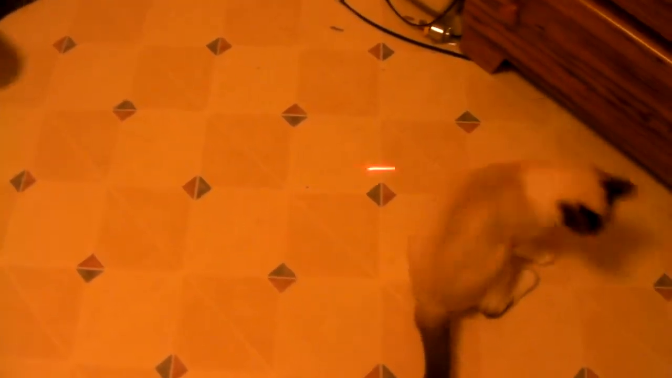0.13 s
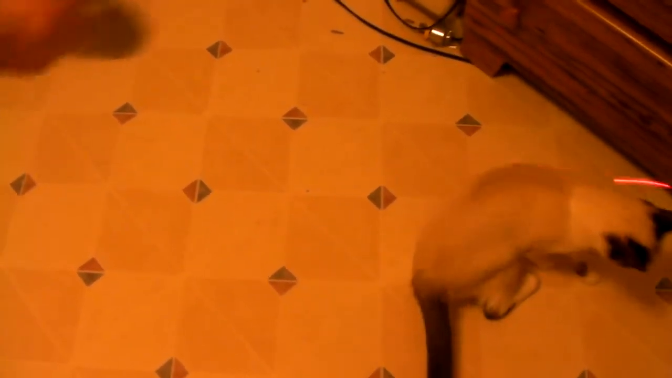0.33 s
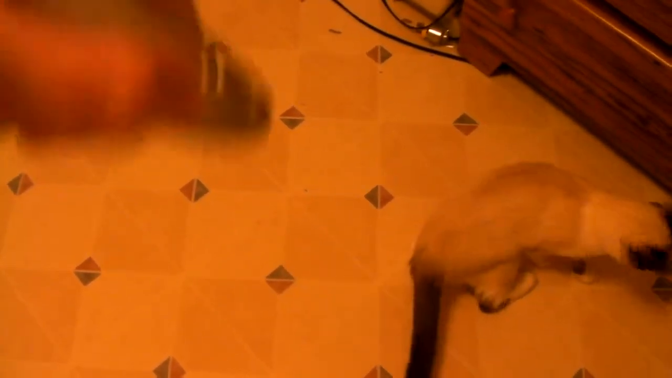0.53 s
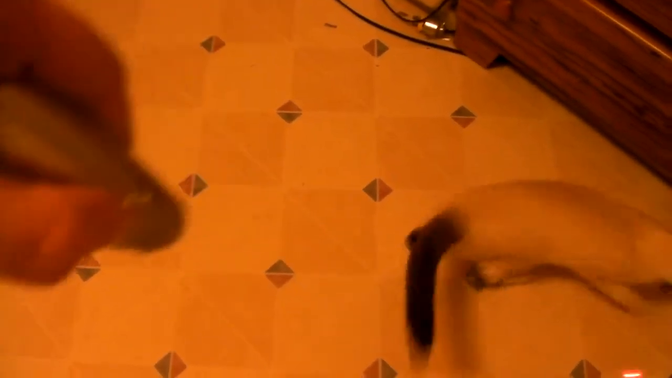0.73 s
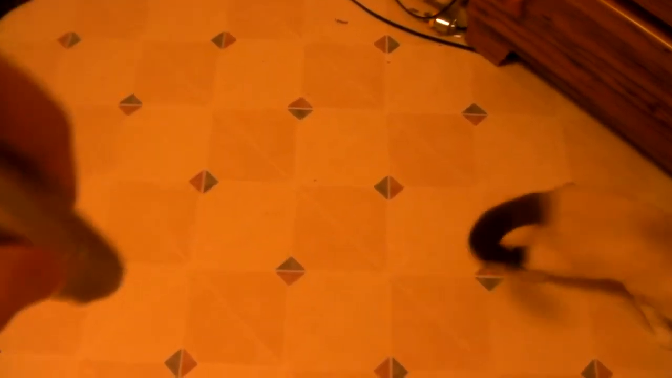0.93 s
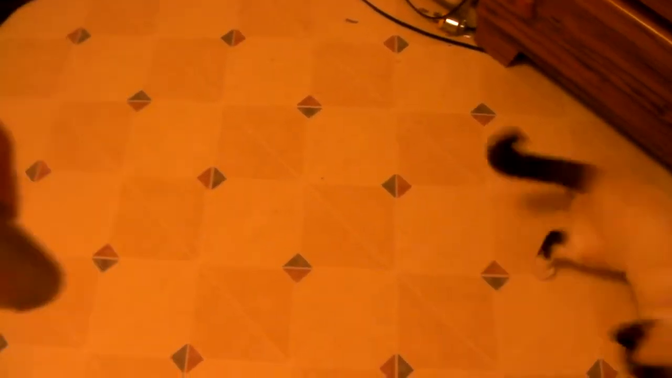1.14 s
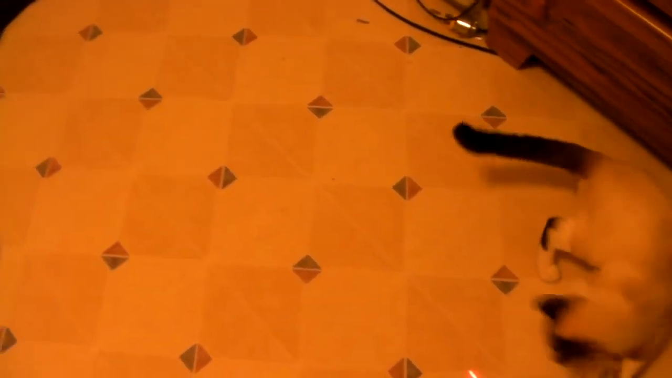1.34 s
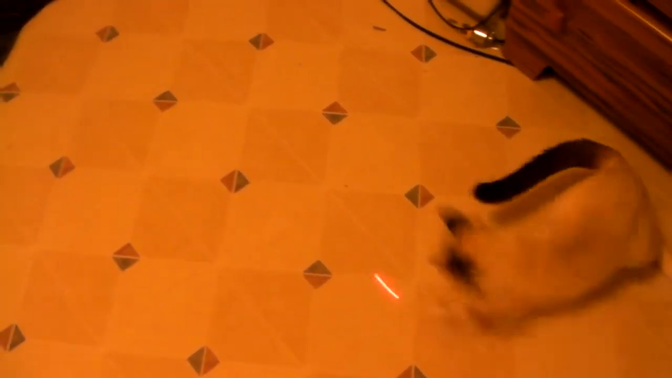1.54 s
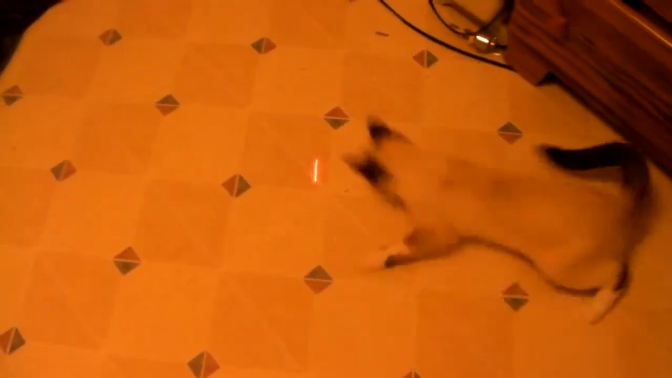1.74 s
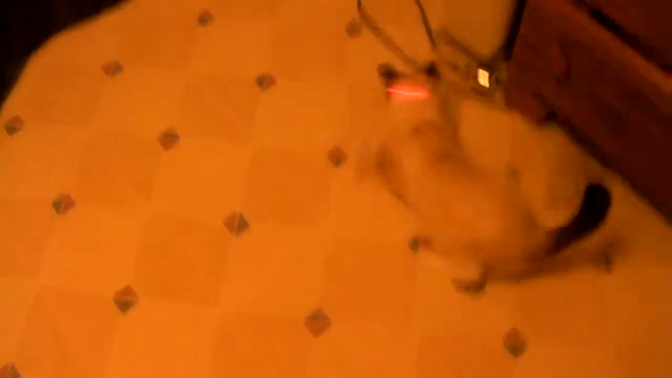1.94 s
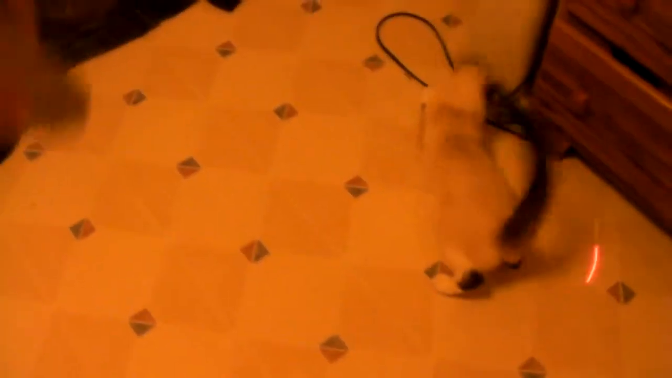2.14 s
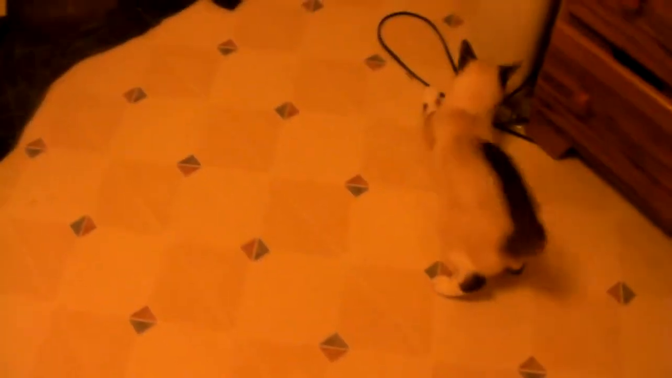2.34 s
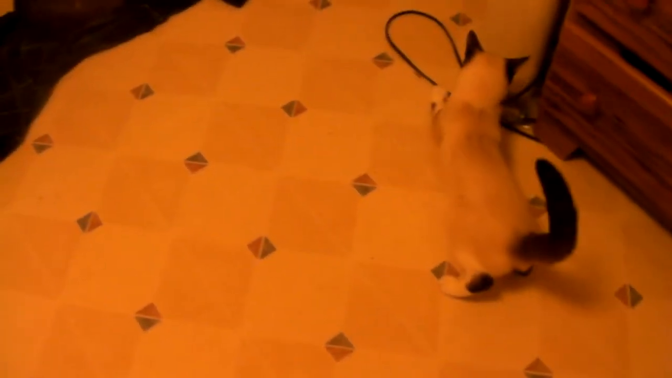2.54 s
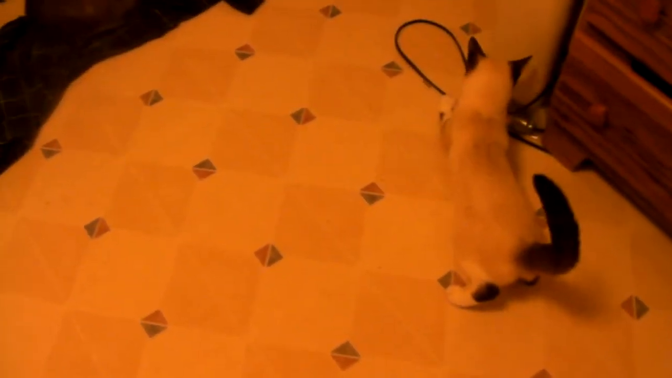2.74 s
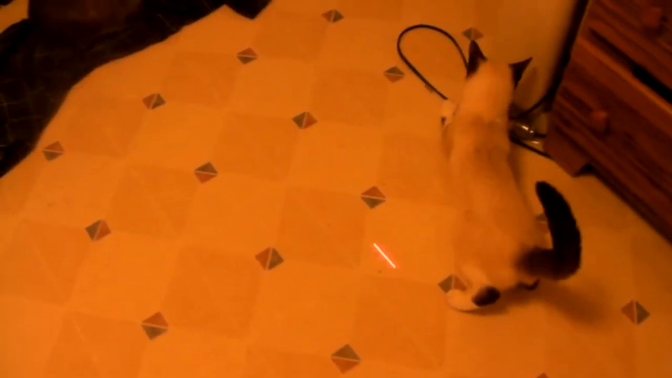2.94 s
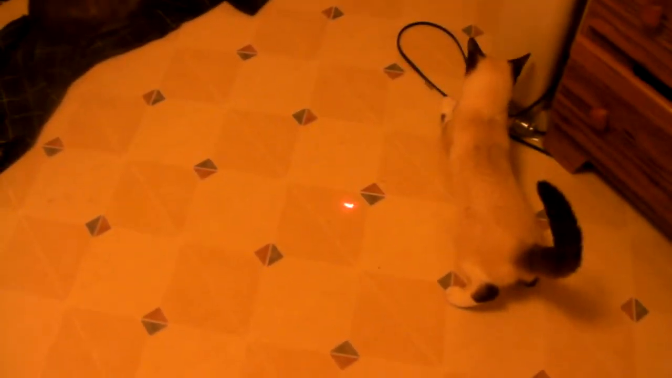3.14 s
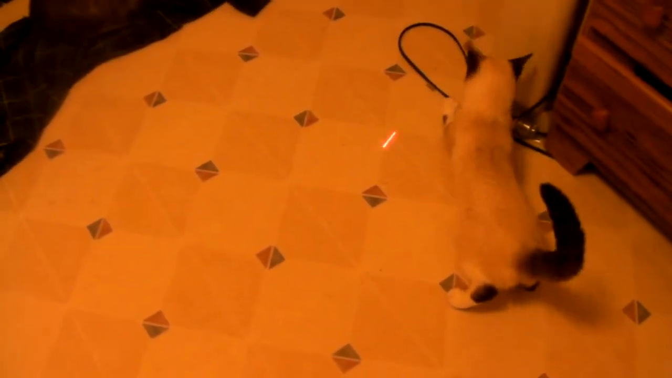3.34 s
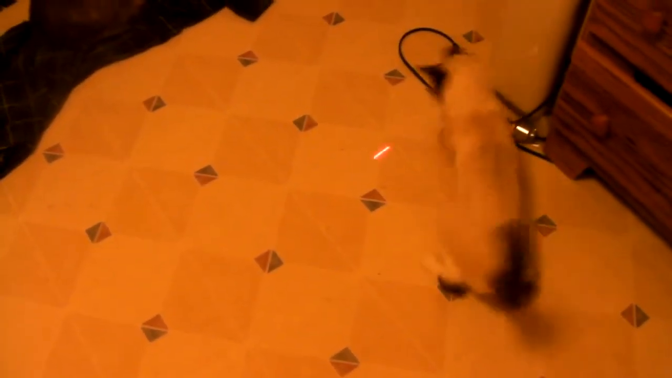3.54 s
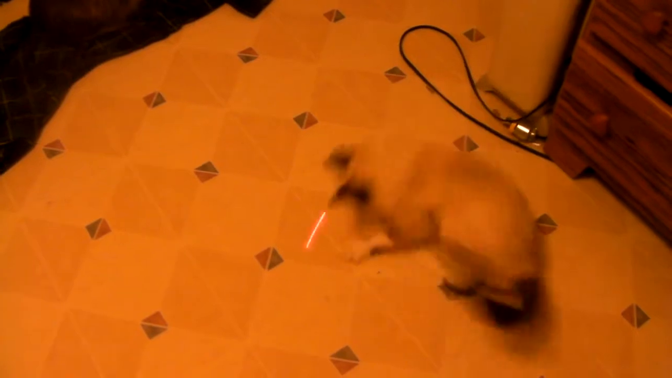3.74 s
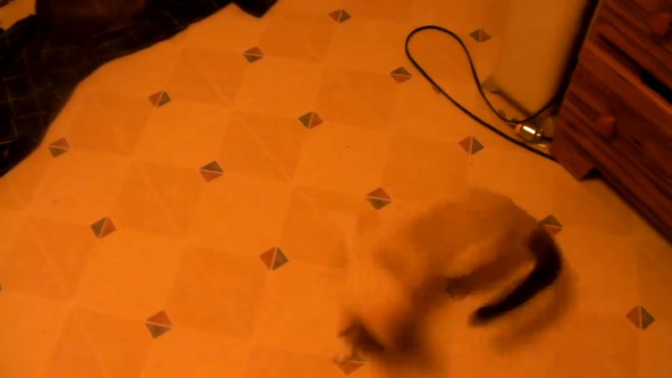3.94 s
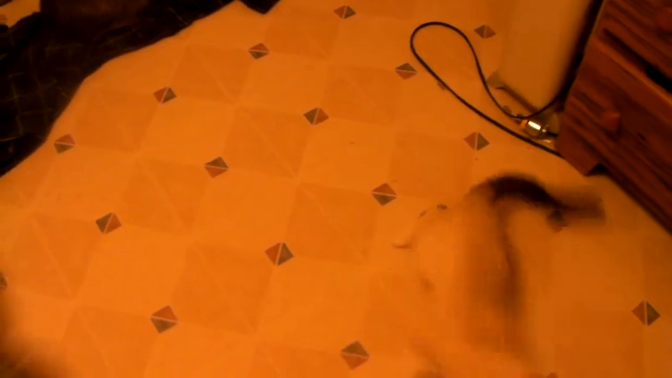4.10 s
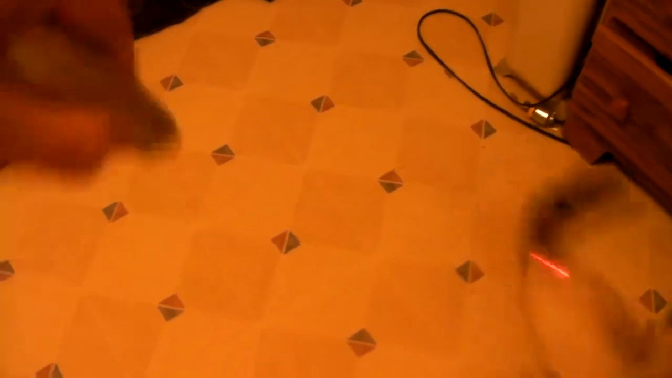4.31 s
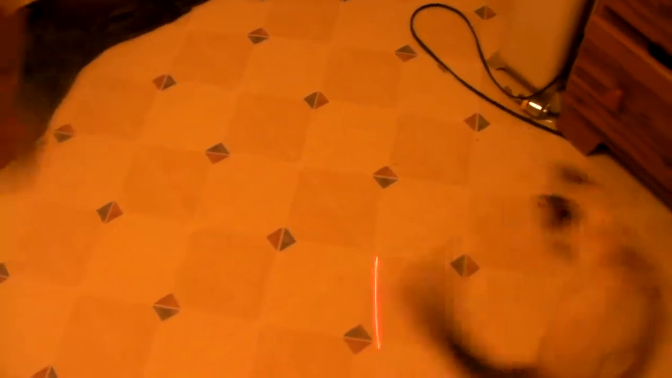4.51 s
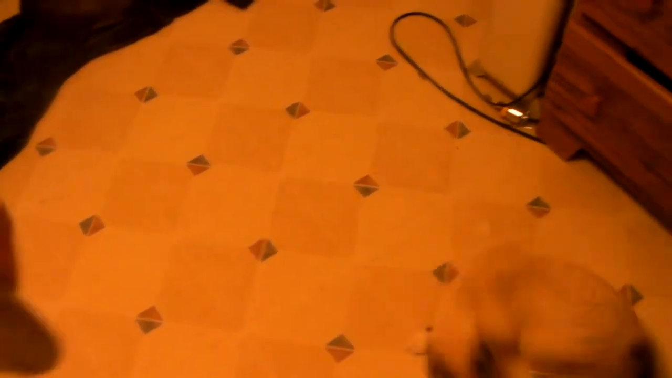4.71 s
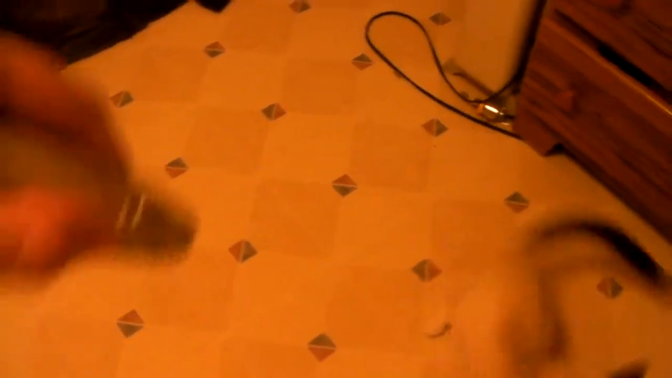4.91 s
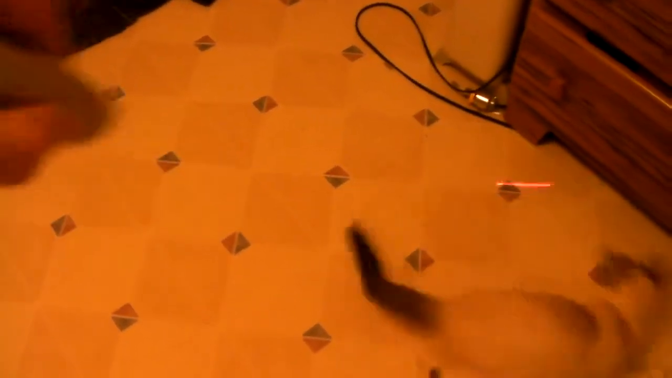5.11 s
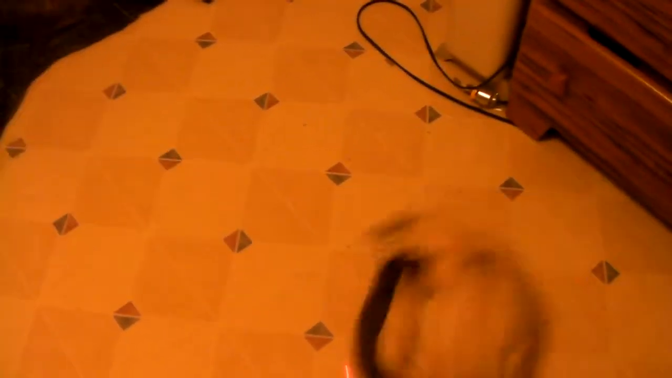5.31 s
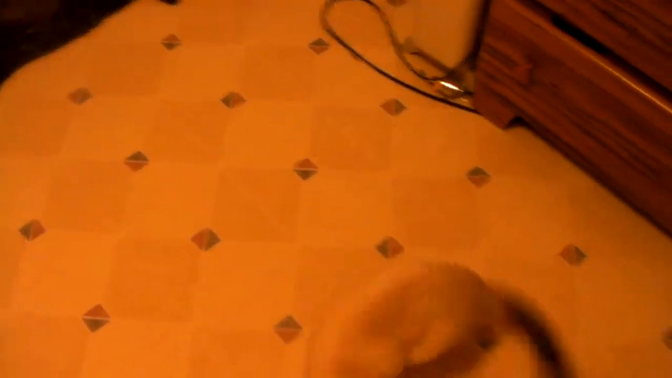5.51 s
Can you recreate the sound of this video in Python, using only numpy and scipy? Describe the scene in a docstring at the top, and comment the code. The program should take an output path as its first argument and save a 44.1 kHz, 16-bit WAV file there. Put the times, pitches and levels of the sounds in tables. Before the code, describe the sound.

In a small quiet room, a kitten pads softly on a hard floor, then dashes with sharp claw clicks, gritty skids and low paw thumps, ending in a hollow bump against a wooden chest. After a lull it scrambles again for longer, fur swishing, with a fainter bump near the end. A nearby hand-held microphone also picks up light hiss and a faint machine whirr.

```python
"""Kitten chasing a dot of light

A kitten dashes over a hard floor in a small room, heard from a hand-held camera. Its claws snap and
ring as they strike and rasp as they skid; its pads rub and thump the floor, and its fur swishes with
each step. Once it runs into the corner by a wooden chest, and a fainter bump comes near the end.
Under it all lie still air, a faint machine whirr and the hiss of the camera."""
import sys
import numpy as np
from scipy import signal
from scipy.fft import rfft, irfft
from scipy.io import wavfile
from scipy.ndimage import uniform_filter1d

SR = 44100
rng = np.random.default_rng(int(sys.argv[2]) if len(sys.argv) > 2 else 0)


def to_wav(s):
    """Save 16-bit WAV."""
    ch = np.atleast_2d(s).T  # columns
    pcm = np.round(np.clip(ch, -1, 1) * 32767)  # PCM
    wavfile.write(sys.argv[1], SR, pcm.astype(np.int16))


N = 245195


def gain_of(db):
    """Decibels to amplitude."""
    return 10 ** (np.asarray(db) / 20)


def curve_at(points, hz):
    """Reads a curve on a log-frequency axis."""
    f, value = np.transpose(points)
    return np.interp(np.log(hz + 1), np.log(f + 1), value)


def add(mix, s, sound):
    """Mixes a stereo sound in at time s."""
    part = mix[:, max(round(s * SR), 0):][:, :sound.shape[1]]
    part += sound[:, :part.shape[1]]


def with_energy(x, seconds):
    """Scales x to the energy of a sound of rms 1 that lasts so many seconds."""
    return x * np.sqrt(seconds * SR / (np.mean(x ** 2) * x.shape[-1] + 1e-30))


def colour(x, spectrum, tilt_db=0, size=1024):
    """Minimum-phase EQ; the tilt, in dB per octave, lifts the treble."""
    hz = abs(np.fft.fftfreq(size, 1 / SR))
    log_gain = np.log(gain_of(curve_at(spectrum, hz) + tilt_db * np.log2(1 + hz / 4000)))
    taps = np.fft.ifft(np.exp(np.conj(signal.hilbert(log_gain)))).real
    return signal.fftconvolve(x, taps)[:len(x)]


def ring(x, modes):
    """Drives a set of damped modes."""
    return sum(gain_of(db) * signal.lfilter(*signal.iirpeak(hz, hz / width, SR), x)
               for hz, width, db in modes)


def soft_push(contact_s, size=12000):
    """The uneven force of a soft contact: it swells and is gone."""
    u = np.arange(size) / SR / contact_s
    return rng.standard_normal(size) * u * np.exp(-u ** 2 / 3)


def stereo_noise(likeness, size):
    """Noise spectra at two close microphones, as alike as the given curve says."""
    hz = np.fft.rfftfreq(size, 1 / SR)
    mid, side = rfft(rng.standard_normal((2, size)))
    same = np.clip(curve_at(likeness, hz), -1, 1)
    mid, side = mid * np.sqrt((1 + same) / 2), side * np.sqrt((1 - same) / 2)
    return hz, np.array([mid + side, mid - side])


# Reverb EQ: f/Hz, level/dB
WALL_EQ = [(100, 0), (1300, 1.5), (3000, -1.5), (5000, -4.5), (9000, 1.5), (16000, -6.5)]
# Reverb decay: f/Hz, T60/s
ROOM_DECAY = [(80, 0.82), (210, 0.14), (500, 0.36), (1500, 0.21), (3800, 0.24), (10000, 0.24),
              (16000, 0.37)]
# Stereo image of the reverb: f/Hz, left-right correlation
ROOM_LIKENESS = [(100, 0.89), (400, 0.97), (1500, 0.84), (3200, 0.7), (5000, 0.16), (8000, 0.018),
                 (16000, 0.11)]


def in_room(x, wet_db, early_boost=0.55, early_s=0.0046, left_lag_samples=0.98, size=16384):
    """Direct sound plus reflections, drawn afresh for each spot on the floor."""
    _, noise = stereo_noise(ROOM_LIKENESS, size)
    hz, t, bands = signal.stft(irfft(noise), SR, nperseg=256)
    decay = gain_of(curve_at(WALL_EQ, hz)[:, None] - 60 * t / curve_at(ROOM_DECAY, hz)[:, None])
    tail = signal.istft(bands * decay, SR, nperseg=256)[1][:, :size]
    t = np.arange(size) / SR
    tail *= 1 + early_boost * np.exp(-t / early_s)  # near furniture answers first
    tail *= 1 - np.exp(-(t / 0.0018) ** 2)
    direct = np.sinc(np.arange(size) - 2 - np.array([[left_lag_samples], [0]]))
    response = direct + gain_of(wet_db) * with_energy(tail, 1 / SR)
    return signal.fftconvolve(x[None], response, axes=1)


# Bed of room tone and hiss: f/Hz, level/dB
HUSH_EQ = [(15, -56), (25, -19), (43, -10), (63, -9), (108, -6), (223, -9.5), (270, -14.5), (405, -3),
           (1020, -14.5), (1520, -13.5), (1650, -20.5), (2410, -17), (2840, -19), (13200, -23),
           (16000, -23)]
# Stereo image of the bed: f/Hz, left-right correlation
HUSH_LIKENESS = [(40, 0.75), (300, 0.28), (1000, 0.19), (3000, 0.043), (8000, 0.1), (16000, 0.19)]
# Narrow bands of machine noise: f/Hz, width/Hz, level/dB
WHIRR_BANDS = [(400, 70, -74), (1530, 56, -86), (2448, 27, -83.5)]
# The whirr's single swell: t/s, half length/s, boost/dB
WHIRR_RISE = (1.02, 0.073, 8.5)


def background(hush_db=-63.5, drift_db=1.7):
    """Still air, microphone hiss and a faint machine whirr whose level wanders."""
    hz, noise = stereo_noise(HUSH_LIKENESS, N)
    hush = irfft(noise * gain_of(curve_at(HUSH_EQ, hz)), N)
    hush = gain_of(hush_db) * with_energy(hush, N / SR)
    whirr = sum(gain_of(db) * with_energy(ring(rng.standard_normal(N), [(f, width, 0)]), N / SR)
                for f, width, db in WHIRR_BANDS)
    drift = with_energy(uniform_filter1d(rng.standard_normal(N), 6000), N / SR)
    s, half_s, swell_db = WHIRR_RISE
    swell = np.exp(-((np.arange(N) / SR - s) / half_s) ** 2)
    return hush + whirr * gain_of(drift_db * drift + swell_db * swell)


# Soft swish of fur: f/Hz, level/dB
FUR_EQ = [(100, -18), (600, 0.5), (1500, -2.5), (2200, 1), (3500, -0.5), (6000, -5), (10000, -9),
          (16000, -26)]


def fur_swish(level_db=-45.5, db_per_thud_db=0.7, rise_s=0.15, fall_s=0.21, ticks_per_s=500):
    """Fur brushes with tiny ticks in it, swelling around each step, louder for a heavier one."""
    t, motion = np.arange(N) / SR, 0
    for s, thud_db, *_ in PAW_STEPS:
        swell = np.exp(-np.maximum((s - t) / rise_s, (t - s) / fall_s))
        motion = np.maximum(motion, gain_of(level_db + db_per_thud_db * thud_db) * swell)
    ticks = (rng.random(N) < ticks_per_s / SR) * gain_of(-np.minimum(rng.exponential(1, N), 4))
    swish = with_energy(colour(ticks + 0.08 * rng.standard_normal(N), FUR_EQ), N / SR)
    return in_room(swish * motion, wet_db=7.0)[:, :N]


# Low chafes of a pad on the floor: t/s, length/s, f/Hz, level/dB
PAD_RUBS = [(1.445, 0.037, 578, -56), (4.161, 0.031, 540, -53.5), (4.264, 0.036, 441, -47.5),
            (4.435, 0.038, 555, -59), (4.992, 0.032, 966, -60.5)]


def pad_rubs(width_hz=130):
    """A pad sticks and slips unevenly, which makes a narrow band of noise."""
    out = np.zeros((2, N))
    for s, length, hz, db in PAD_RUBS:
        n = int(length * SR)
        slips = np.pad(rng.standard_normal(n) * signal.windows.tukey(n, .4), (0, 2000))
        band = [(hz, width_hz, 0)]
        chafe = in_room(ring(ring(slips, band), band), wet_db=-5.5)
        add(out, s, gain_of(db) * with_energy(chafe, length))
    return out


# Ring of the wooden panel: f/Hz, width/Hz, level/dB
WOOD_MODES = [(264, 47, 0.5), (359, 18, 10.5), (399.7, 16, 12.5), (442, 35, 4), (520, 23, -14),
              (696, 24, -19)]
# Clatter on top of the ring: f/Hz, level/dB
CLATTER_EQ = [(100, -19.5), (500, -7), (900, -9.5), (1700, -6), (3000, -14.5), (5000, -11), (8000, -19.5),
              (15000, -23)]
# Body hits on wood: t/s, level/dB, clatter against ring/dB
BODY_HITS = [(2.0172, -30.5, -2.5), (5.507, -49.5, 2)]


def wood_bumps(blow_s=0.00017, clatter_s=0.018, rattle=0.02, energy_s=.028):
    """The body's blunt blow rings a wooden panel; its brief clatter scatters around the corner."""
    out = np.zeros((2, N))
    for s, db, clatter_db in BODY_HITS:
        crack = rattle * soft_push(clatter_s)
        crack[0] += 1
        u = np.arange(len(crack)) / SR / blow_s
        panel = with_energy(in_room(ring(u * np.exp(-u), WOOD_MODES), wet_db=-4), energy_s)
        clatter = with_energy(in_room(colour(crack, CLATTER_EQ), wet_db=1), energy_s)
        add(out, s, gain_of(db) * (panel + gain_of(clatter_db) * clatter))
    return out


# Deep thud of the floor: f/Hz, width/Hz, level/dB
THUD_MODES = [(66.6, 46, 5.5), (101, 15, 3.5), (168.2, 42, 2.5), (193.6, 4.4, -6.5), (256, 7.3, -16)]
# Hollow knock of the floor: f/Hz, width/Hz, level/dB
KNOCK_MODES = [(356, 22, 20), (381, 14.3, 13), (409, 124, 12), (527, 19, -24), (640, 43, -66)]


def paw(thud_db, knock_db, tilt_db=0, thud_hz=(82, 310), knock_hz=(310, 720), energy_s=.04):
    """A soft pad drives the deep modes of the floor, with a hollow knock above them."""
    deep = [(hz, width, db + tilt_db * np.log2(hz / thud_hz[0])) for hz, width, db in THUD_MODES]
    out = 0
    for modes, db, band_hz in (deep, thud_db, thud_hz), (KNOCK_MODES, knock_db, knock_hz):
        # the pad softens the top, and the floor radiates little below its lowest mode
        bandpass = signal.butter(2, band_hz, "bandpass", fs=SR, output="sos")
        force = signal.sosfilt(bandpass, soft_push(contact_s=0.0083))
        out += gain_of(db) * with_energy(in_room(ring(force, modes), wet_db=-1.5), energy_s)
    return out


# Each spot on the kitten's path favours other floor modes: t/s, thud tilt/(dB per octave)
PATH_TILT = [(1.45, -8), (1.75, -10), (1.95, -11), (3.75, -8), (3.9, 3), (4.03, -4.5), (4.6, 2), (4.92, 15),
             (5.12, 6), (5.3, 3)]
# Landings and push-offs: t/s, thud/dB, knock/dB, skid/dB, skid length/s, skid tilt/(dB per octave)
PAW_STEPS = [(0.07, -61, -80, -90, 0.041, 1), (1.45, -55, -57.5, -65, 0.033, 1),
             (1.596, -57.5, -76, -60, 0.094, 6.5), (1.731, -41, -40.5, -45, 0.083, 5.5),
             (1.863, -39.5, -45.5, -44.5, 0.062, 5), (1.927, -51, -62, -44.5, .04, 10),
             (2.019, -58.5, -54, -43.5, 0.049, -2.5), (3.408, -70, -63, -77, 0.046, -1),
             (3.53, -61, -65, -73.5, 0.069, -1), (3.628, -70, -64, -62, 0.11, 6),
             (3.753, -48.5, -67, -56.5, 0.065, 8.5), (3.832, -44, -48, -46.5, 0.056, 6.5),
             (3.907, -49, -53, -54, 0.078, 5), (4.029, -44, -65, -55, .075, 12.5),
             (4.095, -62, -51, -47, 0.051, 0), (4.323, -41, -40, -43, 0.1, 8),
             (4.62, -37.5, -40.5, -43, 0.056, 5.5), (4.693, -56, -45.5, -56.5, 0.033, 1),
             (4.793, -55.5, -56, -65, 0.16, 3), (4.904, -48, -44, -47, 0.061, 4.5),
             (5.116, -48, -52, -56, 0.052, 8), (5.257, -55.5, -50, -48, 0.043, 9.5),
             (5.356, -52.5, -60, -49, 0.093, 10.5), (5.417, -37.5, -42.5, -48, 0.069, 7.5),
             (5.501, -57, -57, -52, .15, 11.5)]


def footfalls(soft_steps=16, soft_thud_db=-69.5, soft_knock_db=-70, spread_db=8):
    """Paws thump through each dash, over soft padding at an uneven pace throughout."""
    out = np.zeros((2, N))
    for s, thud_db, knock_db, *_ in PAW_STEPS:
        add(out, s, paw(thud_db, knock_db, np.interp(s, *np.transpose(PATH_TILT))))
    for k, (when, weight) in enumerate(rng.random((soft_steps, 2))):
        s = (k + when) / soft_steps * N / SR
        weight_db = spread_db * (2 * weight - 1)
        add(out, s, paw(soft_thud_db + weight_db, soft_knock_db + weight_db))
    return out


# Gritty rasp of a skid: f/Hz, level/dB
GRIT_EQ = [(100, -12), (700, -13), (1300, -4.5), (2100, -5), (3000, -3.5), (4000, -3.5), (5500, -5.5),
           (8000, -15.5), (11000, -20.5), (16000, -21)]


def skid(length, db, tilt_db, attack_s=0.016, release_s=0.022, catches_per_s=1800, size=16384):
    """A dragged claw catches and slips on the grain of the floor many times."""
    t = np.arange(size) / SR
    ramp = np.clip(np.minimum(t / attack_s, (length - t) / release_s), 0, 1)
    pressure = np.sin(np.pi / 2 * ramp) ** 2
    caught = rng.random(size) < catches_per_s / SR
    catches = caught * gain_of(2 * np.minimum(rng.exponential(1, size), 3))
    drag = (catches * rng.choice([-1, 1], size) + 0.098 * rng.standard_normal(size)) * pressure
    return gain_of(db) * in_room(with_energy(colour(drag, GRIT_EQ, tilt_db), length), wet_db=-2)


# Long drag in the tightest spin: t/s, length/s, level/dB, treble tilt/(dB per octave)
SPIN_DRAG = (5, 0.18, -56, 10)


def claw_skids(lead_s=.013):
    """The claws start to slip just before each step of a dash, and drag right round the spin."""
    out = np.zeros((2, N))
    for s, _, _, db, length, tilt_db in PAW_STEPS:
        add(out, s - lead_s, skid(length, db, tilt_db))
    add(out, SPIN_DRAG[0], skid(*SPIN_DRAG[1:]))
    return out


# Ring of a claw pitched at eq_hz: f/Hz, level/dB
RING_EQ = [(60, -52), (400, -35), (1000, -22.5), (1700, -13), (2300, -3.5), (2800, 1.5), (3600, 2),
           (4500, -3), (5700, -10.5), (7000, -12), (9000, -24.5), (16000, -35.5)]
# Bright snap of its tip: f/Hz, level/dB
SNAP_EQ = [(100, -46), (1100, -41), (2300, -19), (6000, 4.5), (10000, -0.5), (12500, -5), (16000, -12)]


def claw(db, hz, snap_db, eq_hz=3350, snap_s=0.00027, chatter_s=0.0009, chatter=0.23, firm_db=-21,
         rebound_s=0.001205, size=1024):
    """A claw snaps and rings briefly; a light touch chatters and rebounds, a firm one sticks."""
    t = np.arange(size) / SR
    looseness = chatter * gain_of(np.clip(2 * (firm_db - db), 0, 9))
    recatches = (rng.random(size) < .15) * rng.standard_normal(size) * np.exp(-t / chatter_s)
    rebound = np.sinc((t - rebound_s * rng.uniform(0.72, 1.3)) * SR)
    strike = (t == 0) + looseness * recatches + 1.1 * (looseness - chatter) * rebound
    tone = with_energy(colour(strike, np.array(RING_EQ) * [hz / eq_hz, 1]), .001)
    grit = 0.51 * rng.standard_normal(size) * np.exp(-t / snap_s)
    snap = with_energy(colour(strike + grit, SNAP_EQ), .001) * gain_of(snap_db)
    return gain_of(db) * (in_room(tone, wet_db=-4.0) + in_room(snap, wet_db=-6.0))


# Light ticks in the final scramble: start/s, end/s, level/dB, spread/dB
SCRAMBLE = (5, 5.55, -49.5, -8)


def scrabble(count=18):
    """Loose claws tick at an uneven pace while the kitten spins."""
    out = np.zeros((2, N))
    start, end, db, spread_db = SCRAMBLE
    for k, (when, force) in enumerate(rng.random((count, 2))):
        s = start + (end - start) * (k + when) / count
        add(out, s, claw(db + spread_db * (2 * force - 1), hz=3950, snap_db=-3))
    return out


# Claw pitch: landing flat with no snap/Hz, on its tip with a 0 dB snap/Hz
CLAW_PITCH = (3160, 4320)
# Foreground claw clicks: t/s, level/dB, snap against ring/dB
CLAW_STRIKES = [(0.161, -60, -4), (0.9799, -48.5, -3), (1.4521, -42.5, -12), (1.5984, -43, -7.5),
                (1.6389, -37, -18), (1.7389, -23.5, -8.5), (1.7579, -26.5, -12), (1.7665, -20.5, -15.5),
                (1.8715, -18, -15), (1.9223, -29.5, 0.5), (2.0153, -30, -15), (2.0319, -29.5, -6),
                (3.6242, -45, -2), (3.6877, -42.5, -3.5), (3.7497, -35, -16), (3.768, -35, -18),
                (3.8382, -20, -19), (3.8432, -28.5, -2), (3.9099, -34, -4), (4.0435, -35, -6.5),
                (4.0926, -39, -5), (4.1037, -20.5, -13.5), (4.2236, -46.5, -5), (4.3304, -25.5, 0),
                (4.3654, -21.5, 0), (4.6009, -43, -1), (4.6315, -23, -12), (4.842, -41.5, -4),
                (4.9156, -22.5, -9), (5.11, -25.5, -3), (5.2624, -29.5, -2.5), (5.3602, -35, 0.5),
                (5.4184, -33, -11.5), (5.4251, -28, -3.5), (5.508, -39.5, -23), (5.5513, -35.5, -4)]


def claw_clicks(toes=2, toe_hz=3800, toe_octaves=.1, toe_db=-17.5, toe_spread_db=3.5):
    """Each strike rings higher the sharper it is, and the neighbouring toes tick lightly around it."""
    out = np.zeros((2, N))
    flat_hz, tip_hz = CLAW_PITCH
    for s, db, snap_db in CLAW_STRIKES:
        add(out, s, claw(db, flat_hz + (tip_hz - flat_hz) * gain_of(snap_db), snap_db))
        offsets_s = rng.uniform(-.004, .03, toes)
        for offset, (force, pitch) in zip(offsets_s, rng.standard_normal((toes, 2))):
            tick_db = db + toe_db + toe_spread_db * force
            add(out, s + offset, claw(tick_db, toe_hz * 2 ** (toe_octaves * pitch), snap_db=-6.5))
    return out


# The room's standing wave: f/Hz, width/Hz, level/dB
ROOM_MODE = [(390, 15, 1)]


def scene():
    """The kitten in the quiet room, whose standing wave hums on after each thump."""
    thumps = footfalls() + pad_rubs() + wood_bumps()
    claws = claw_clicks() + scrabble() + claw_skids()
    return claws + fur_swish() + thumps + ring(thumps, ROOM_MODE) + background()


def record(dry, low_hz=48, top_hz=15000, notch_hz=7900, notch_width_hz=350, edge_hz=16000):
    """The camera thins the deep bass and the top, notches the treble and limits the band."""
    x = signal.sosfilt(signal.butter(2, low_hz, "highpass", fs=SR, output="sos"), dry)
    x = signal.sosfilt(signal.butter(1, top_hz, fs=SR, output="sos"), x)
    x = signal.lfilter(*signal.iirnotch(notch_hz, notch_hz / notch_width_hz, SR), x)
    band_limit = signal.firwin(301, edge_hz, window=("kaiser", 8), fs=SR)
    return signal.oaconvolve(x, band_limit[None], "same", axes=1)


dry = scene()
out = record(dry)
to_wav(out)
```